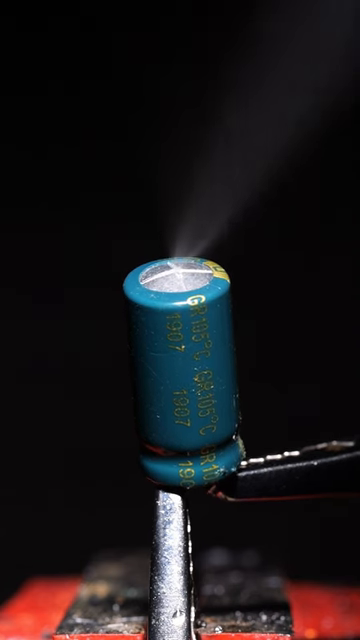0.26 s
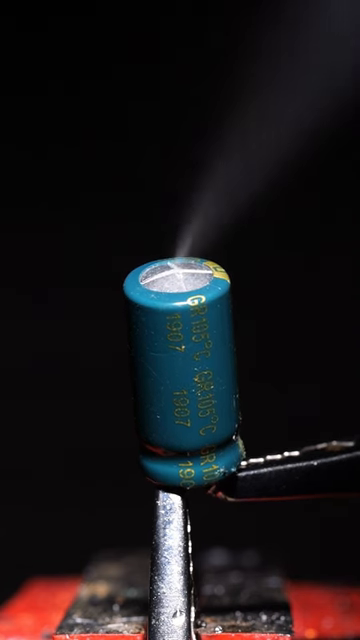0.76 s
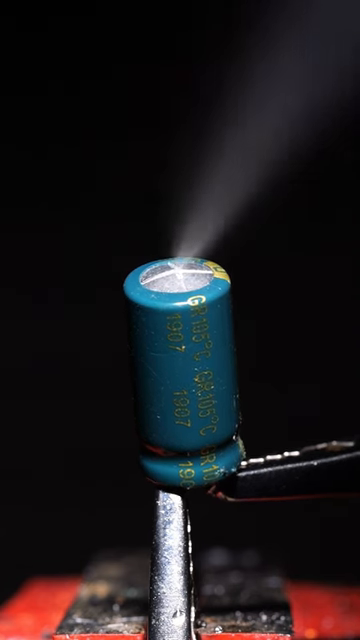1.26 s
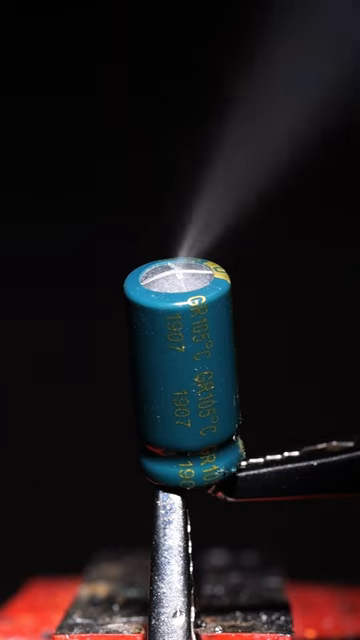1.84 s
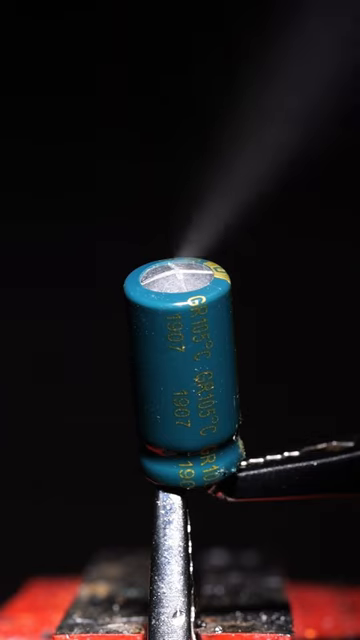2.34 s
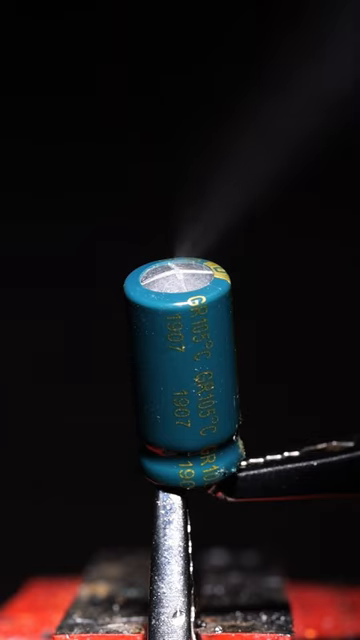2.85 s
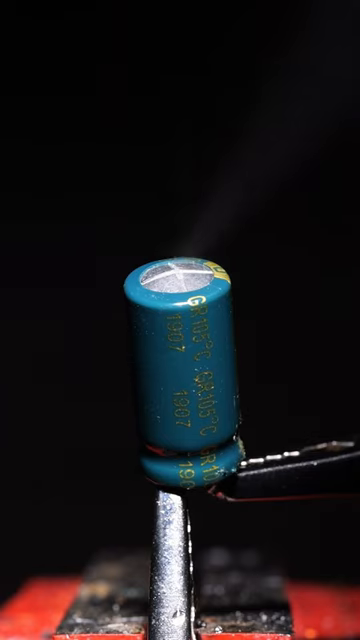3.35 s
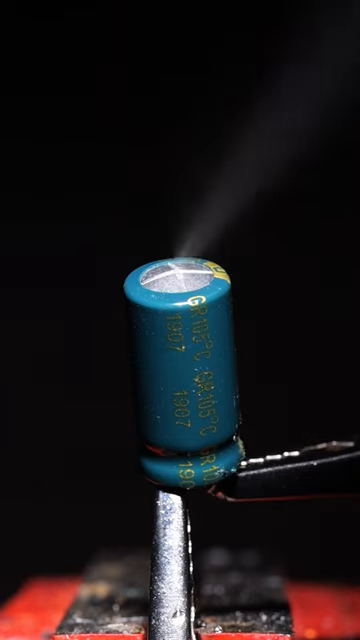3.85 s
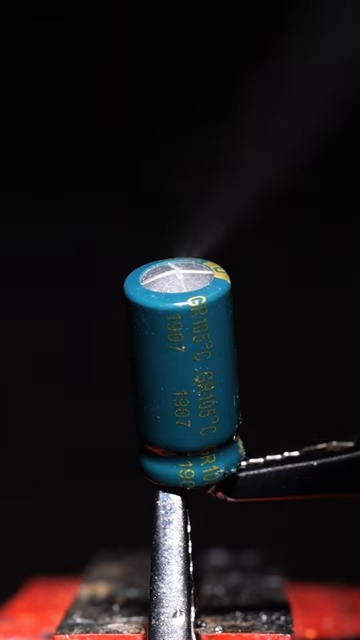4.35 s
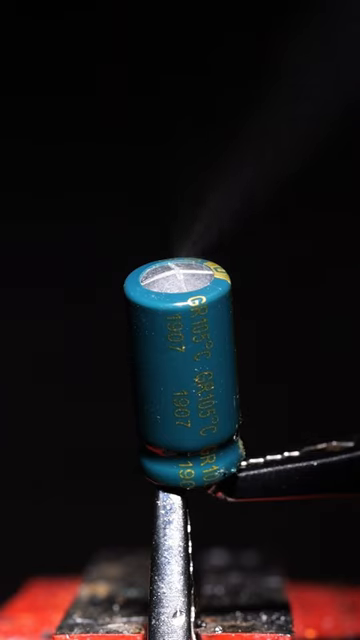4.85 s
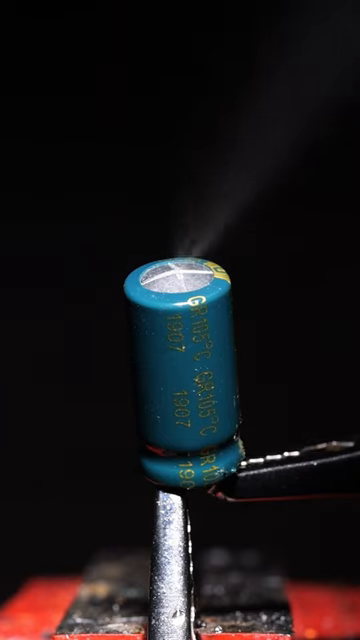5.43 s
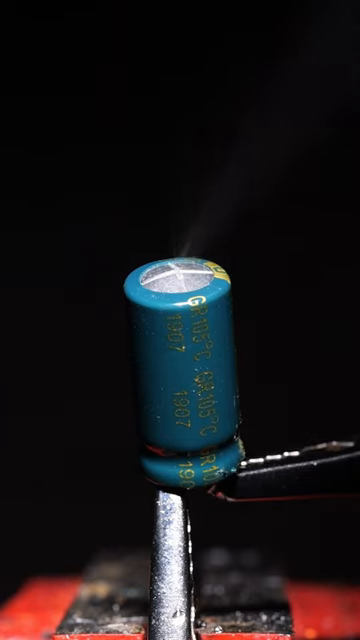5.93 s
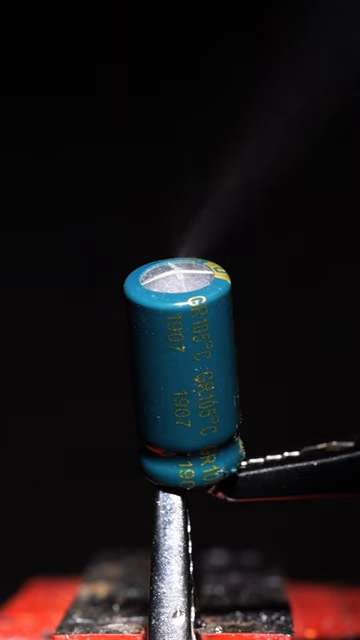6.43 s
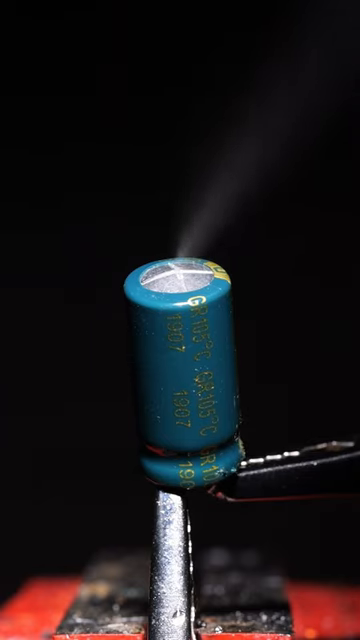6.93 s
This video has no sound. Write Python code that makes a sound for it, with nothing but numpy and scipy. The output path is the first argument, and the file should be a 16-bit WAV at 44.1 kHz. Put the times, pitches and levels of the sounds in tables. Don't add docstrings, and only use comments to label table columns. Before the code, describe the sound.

A sharp, steady hiss of vapour escaping a small burst capacitor, with a low boom fading beneath it and a few brief muffled chokes.

```python
import sys
import numpy as np
from scipy import signal
from scipy.fft import rfft, irfft, next_fast_len
from scipy.io import wavfile
from scipy.ndimage import uniform_filter1d

SR = 44100
rng = np.random.default_rng(int(sys.argv[2]) if len(sys.argv) > 2 else 0)


def master_out(mix):
    frames = np.transpose(np.atleast_2d(mix))
    ceiling = np.clip(frames, -1, 1)
    pcm = np.round(ceiling * 32767).astype(np.int16)
    wavfile.write(sys.argv[1], SR, pcm)


def undo_db(level):
    steps = np.asarray(level, float) / 20
    return 10 ** steps


N = 317324
LEAD = SR // 2
SPAN = next_fast_len(N + SR, real=True)
TIME = (np.arange(SPAN) - LEAD) / SR
HZ = np.fft.rfftfreq(SPAN, 1 / SR) + 1

# (time [s], pressure level [dB], pinch of the slit [0-1])
GAS_PRESSURE = [(0, .5, .2), (.6, .5, 0.23), (1.0, -0.4, 0.5), (1.2, -1.5, 0.5), (1.7, -1, .5),
                (1.95, -0.5, 1), (2.2, -1, 0.8), (2.4, 0, 0.7), (2.52, 0.5, 1), (2.7, 0, 0.56),
                (3.35, 1.5, 0.44), (3.65, 0.7, .2), (3.85, 0, 0), (4.4, 0, 0.25), (5.1, 0.5, 0.2),
                (5.25, 1.5, 0.2), (6.2, 2.2, 0.2), (7.2, 2, 0.15)]


def jet(echo):
    time_s, pressure_points, pinch_points = np.transpose(GAS_PRESSURE)
    pressure_db = np.interp(TIME, time_s, pressure_points)
    pinch = np.interp(TIME, time_s, pinch_points)
    lost_db = choke()
    hiss_db = -34.5 + pressure_db - lost_db
    can_colour, hiss_colour, spray_colour = jet_colours()
    wobble = 0.27 * walk(9) + 0.5 * walk(45)
    sound = can_tones(can_colour, pressure_db, lost_db, echo)
    sound += hiss(hiss_colour, hiss_db, wobble, echo)
    sound += whistle(pressure_db, lost_db, pinch, wobble, echo)
    sound += spray(spray_colour, pressure_db, lost_db, pinch, wobble, echo)
    return sound + rumble(hiss_db, echo)


def hiss(colour, level_db, wobble, echo):
    flutter_db = 0.25 * wobble + 0.069 * walk(70)
    return heard(colour, undo_db(level_db + flutter_db), echo)


def can_tones(colour, pressure_db, lost_db, echo):
    burst_over = ramp(0.95, 0.12)
    boiled_off = ramp(1.63, 0.23)
    level_db = -36 + 0.79 * pressure_db - 0.29 * lost_db
    level_db += 1.3 * (1 - burst_over)
    level_db -= 1.5 * (burst_over - boiled_off)
    flutter_db = 0.09 * walk(33) + 0.48 * walk(3.13)
    return heard(colour, undo_db(level_db + flutter_db), echo)


def spray(colour, pressure_db, lost_db, pinch, wobble, echo):
    level_db = -37.5 + 1.37 * pressure_db - 1.26 * lost_db - 2 * pinch
    flutter_db = 0.3 * wobble + 0.5 * walk(60) + 0.2 * walk(6)
    return heard(colour, undo_db(level_db + flutter_db), echo)


# (frequency [Hz], width [Hz], level [dB])
SLIT_WHISTLE = [(4705, 253, 0)]


def whistle(pressure_db, lost_db, pinch, wobble, echo):
    level_db = -41.5 + 0.56 * pressure_db - 0.54 * lost_db + 4.5 * pinch
    flutter_db = 0.42 * wobble + 0.64 * walk(6)
    colour = np.sqrt(rings(SLIT_WHISTLE, steep=1.46))
    return heard(colour, undo_db(level_db + flutter_db), echo)


# (start time [s], closing time [s], clearing start time [s], clearing time [s], loss level [dB])
DROPLET_CHOKES = [
    (.63, .065, .695, 0.05, 6),
    (2.70, 0.4, 3.235, .085, 8.5),
    (5.025, 0.19, 5.225, 0.033, 9.5),
    (6.905, 0.064, 7.5, .05, 9.5),
]


def choke():
    lost_db = np.zeros(SPAN)
    for start, closing, clears, clearing, depth_db in DROPLET_CHOKES:
        closed = 1 - (1 - ramp(start, closing)) ** 1.9
        lost_db += depth_db * (closed - ramp(clears, clearing))
    return lost_db


# (frequency [Hz], width [Hz], level [dB])
CAN_RINGS = [(950, 104, -2.5), (1006, 172, -1), (1590, 260, -37), (2115, 146, 0), (2177, 63, 2.5),
             (2242, 83, -2.5), (2452, 137, -8.5), (3460, 163, -5), (5130, 330, -4), (5866, 250, -7.5),
             (6527, 360, -3), (6925, 410, -6.5), (7650, 210, -14.5), (9014, 430, -8.5), (10235, 320, -5),
             (11300, 350, -14.5), (12410, 550, -9), (14420, 470, -23.5)]
# (frequency [Hz], level [dB per Hz])
TURBULENCE = [(600, -38), (800, -10.5), (1300, -8), (1900, -6), (2750, -19.5), (3180, -31), (3900, -16),
              (5500, -13.5), (7400, -25), (8100, -22.5), (9600, -19), (11800, -18), (13700, -23.5),
              (15300, -56)]
# (frequency [Hz], frequency [Hz])
RANGE_SPLITS = (3500, 8800)


def jet_colours():
    colour = np.sqrt(rings(CAN_RINGS, steep=1.374) + shape(TURBULENCE) ** 2)
    low, high = [1 / (1 + (HZ / split_hz) ** 5.1) for split_hz in RANGE_SPLITS]
    return colour * np.sqrt(low), colour * np.sqrt(high - low), colour * np.sqrt(1 - high)


# (frequency [Hz], level [dB per Hz])
FLOW_RUMBLE = [(15, -50), (25, -13), (43, -14), (80, -3.5), (244, -11), (281, -19), (462, -19.5),
               (632, -24), (750, -31), (980, -45), (1650, -120)]
# (frequency [Hz], width [Hz], level [dB])
ROOM_RINGS = [(83.4, 9.7, 3), (125, 8.1, 2)]


def rumble(hiss_db, echo):
    level_db = -42 + 0.85 * (hiss_db - hiss_db.max())
    colour = np.sqrt(shape(FLOW_RUMBLE) ** 2 + rings(ROOM_RINGS, steep=1.0))
    return heard(colour, undo_db(level_db), echo)


# (frequency [Hz], level [dB per Hz])
BURST_BOOM = [(8.8, -42), (15, -15), (38, -5.5), (81, 0.5), (165, -10.5), (280, -26.5), (461, -27.5),
              (700, -26.5), (910, -57), (1540, -120)]


def boom(echo):
    level_db = -29 - 14.5 * np.maximum(TIME - 0.22, 0)
    fade = np.clip(2.1 - TIME, 0, 1)
    deep_db = -22.5 - 30 * np.maximum(TIME, 0)
    deep_colour = np.sqrt(rings([(48, 14, 0), (70, 14, -4)], steep=1.5))
    deep = heard(deep_colour, undo_db(deep_db), echo)
    return deep + heard(shape(BURST_BOOM), undo_db(level_db) * fade, echo)


# (frequency [Hz], width [Hz], level [dB])
EQUIPMENT_HUM = [(167.6, 12, 2), (216, 44, -9), (255.4, 16, -7.5), (460, 32, -4.5), (603, 8.4, -8.5)]


def hum(echo):
    return heard(np.sqrt(rings(EQUIPMENT_HUM, steep=1.53)), undo_db(-55), echo)


def room(t60, wet_db, dull_hz):
    t = np.arange(LEAD) / SR
    decay = np.exp(-np.log(1000) * t / t60)
    echoes = rng.standard_normal(len(t)) * decay * (t > 0.002)
    echoes *= undo_db(wet_db) / np.sqrt(np.sum(echoes ** 2))
    wet = rfft(echoes, SPAN) / (1 + 1j * HZ / dull_hz)
    return (1 + wet) / np.sqrt(1 + undo_db(wet_db) ** 2 / (1 + (HZ / dull_hz) ** 2))


# (frequency [Hz], level [dB])
PORT_WIDTH = [(30, -61), (120, -19), (300, -13.5), (700, -3), (1100, -10), (1700, -18), (2200, -23),
              (2800, -27), (3450, -16), (4200, -34), (5400, -29.5), (6000, -17.5), (6900, -18), (8000, -20),
              (15000, -53)]


def heard(colour, gain, echo):
    noise = rng.standard_normal((2, SPAN)) * gain
    source = rfft(noise) * colour / np.sqrt(np.mean(colour ** 2))
    ports = np.array([np.ones(len(HZ)), shape(PORT_WIDTH)])
    return irfft(source * echo * ports, SPAN)[:, LEAD:LEAD + N]


def rings(table, steep):
    power = np.zeros(len(HZ))
    for hz, width, db in table:
        power += undo_db(db) ** 2 / (1 + (2 * (HZ - hz) / width) ** 2) ** steep
    return power


def shape(table):
    hz, db = np.transpose(table)
    return undo_db(np.interp(np.log(HZ), np.log(hz), db))


def walk(rate):
    hold = int(SR / rate)
    steps = np.repeat(rng.standard_normal(SPAN // hold + 1), hold)
    smooth = uniform_filter1d(uniform_filter1d(steps, hold), hold)[:SPAN]
    return smooth / smooth.std()


def ramp(start_s, length_s):
    return np.clip((TIME - start_s) / length_s, 0, 1)


def scene():
    sum_room = room(t60=0.8, wet_db=-8, dull_hz=3500)
    difference_room = room(t60=0.65, wet_db=20, dull_hz=15000)
    echo = np.array([sum_room, difference_room])
    mid, side = jet(echo) + boom(echo) + hum(echo)
    return np.array([mid + side, mid - side])


def band_limit(x):
    return signal.sosfilt(signal.butter(12, 15140, fs=SR, output="sos"), x)


def record(dry):
    top_cut = signal.ellip(6, 0.2, 60, 14930, fs=SR, output="sos")
    bass_cut = signal.butter(4, 33, "high", fs=SR, output="sos")
    mix = signal.sosfilt(bass_cut, signal.sosfilt(top_cut, dry))
    return band_limit(mix)


dry = scene()
out = record(dry)
master_out(out)
```